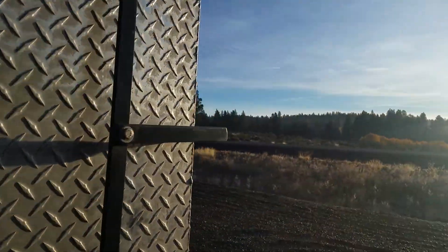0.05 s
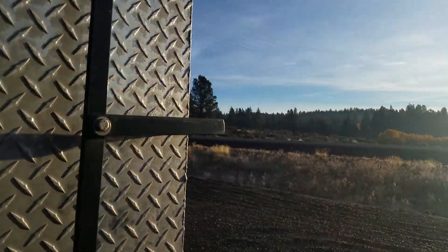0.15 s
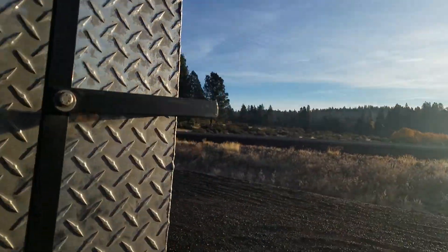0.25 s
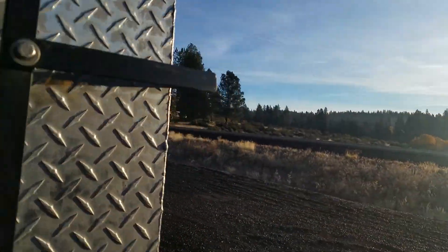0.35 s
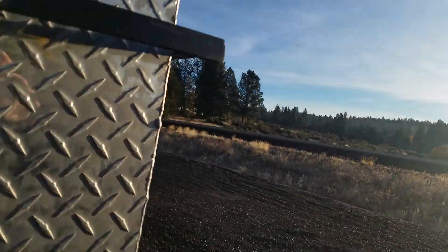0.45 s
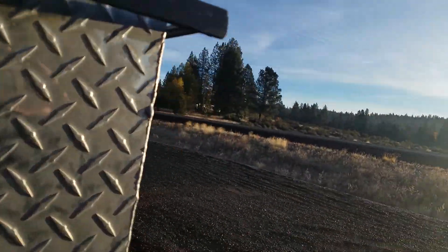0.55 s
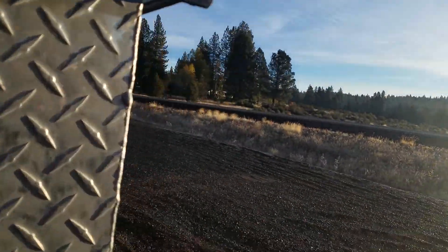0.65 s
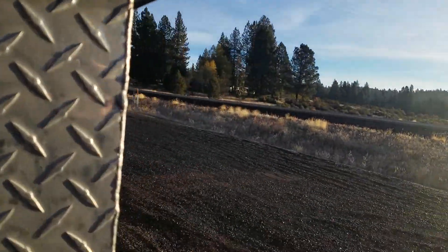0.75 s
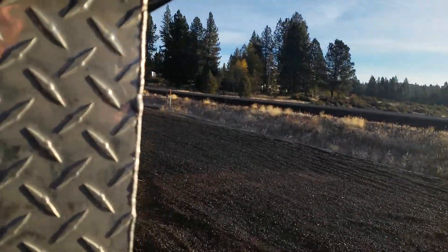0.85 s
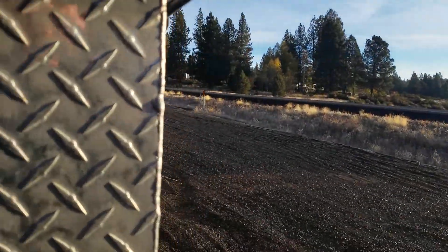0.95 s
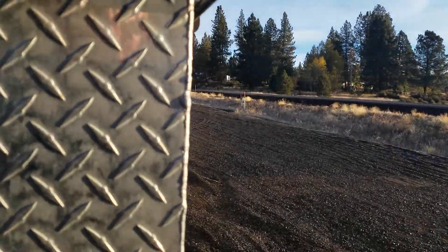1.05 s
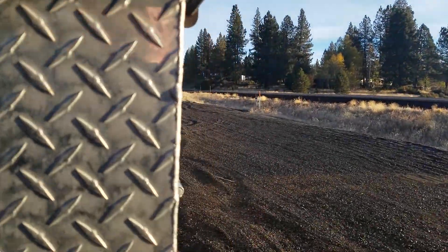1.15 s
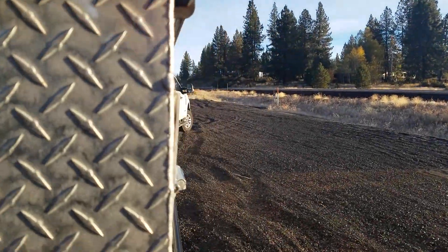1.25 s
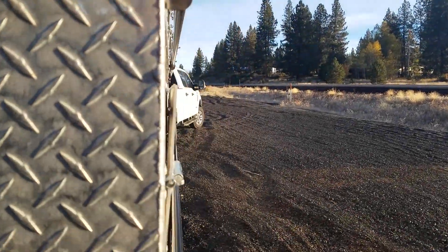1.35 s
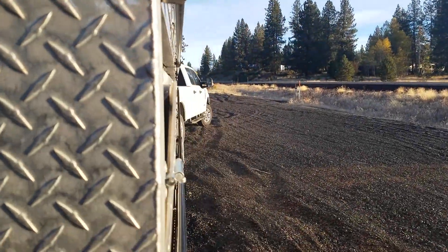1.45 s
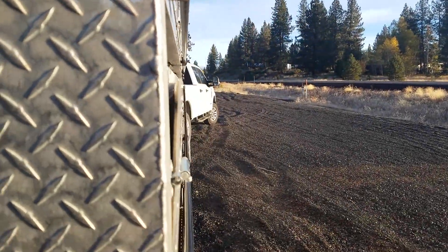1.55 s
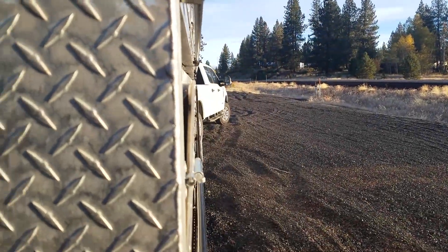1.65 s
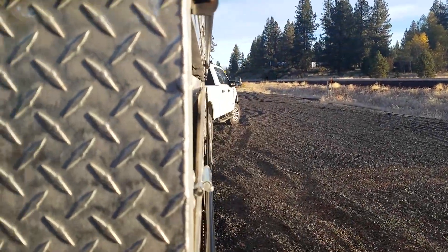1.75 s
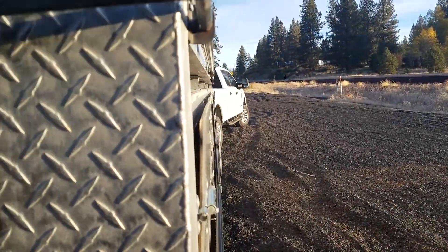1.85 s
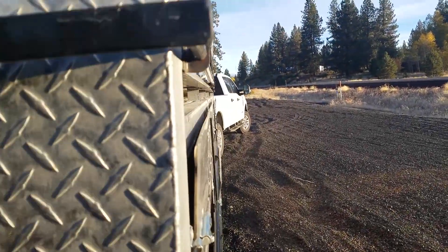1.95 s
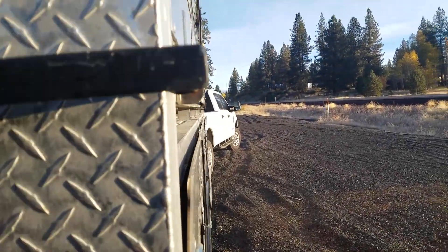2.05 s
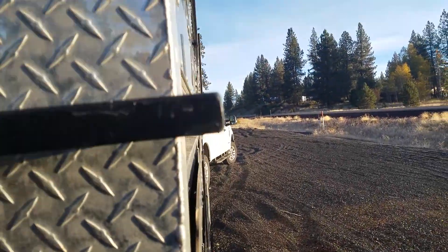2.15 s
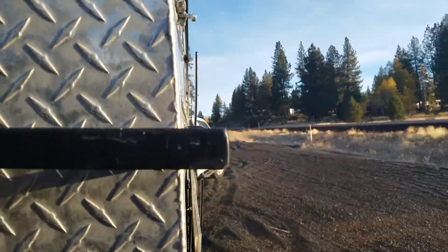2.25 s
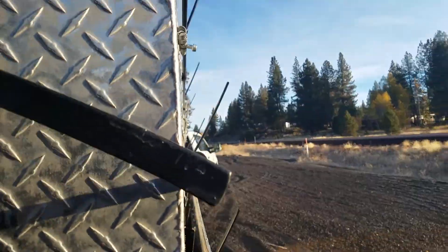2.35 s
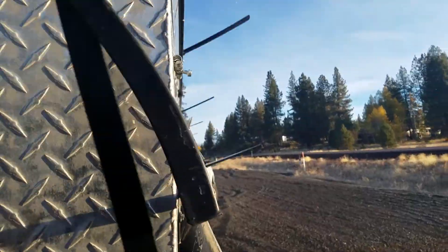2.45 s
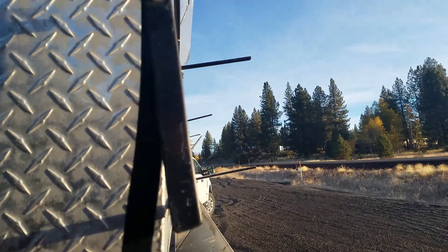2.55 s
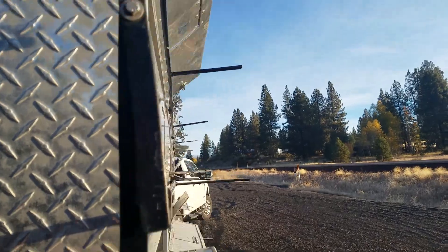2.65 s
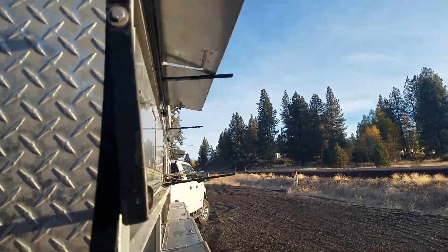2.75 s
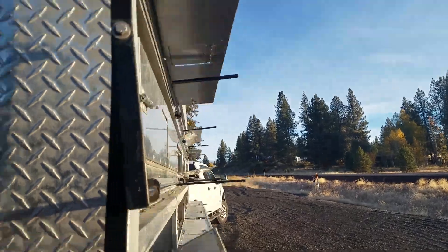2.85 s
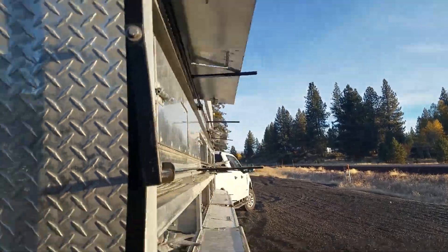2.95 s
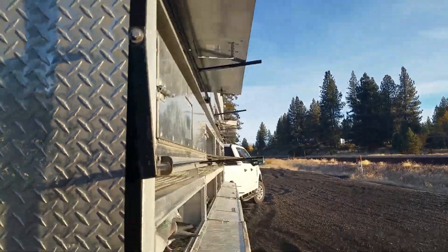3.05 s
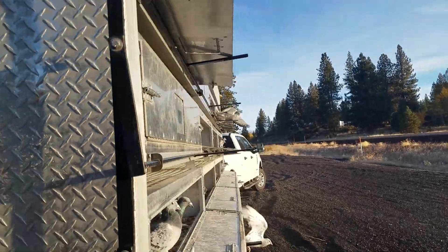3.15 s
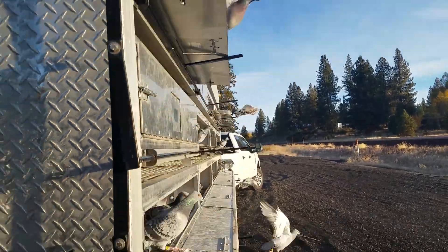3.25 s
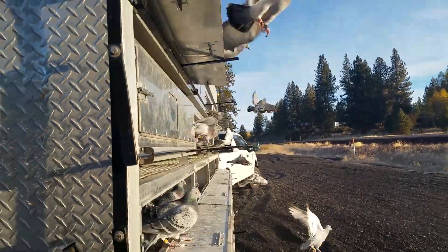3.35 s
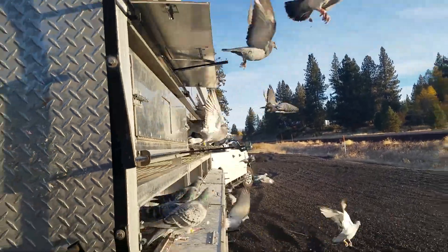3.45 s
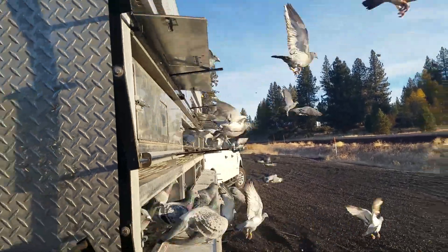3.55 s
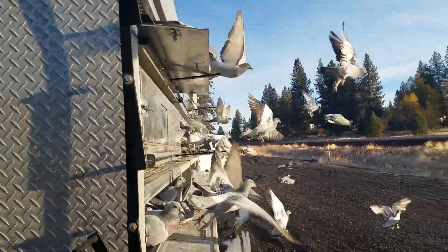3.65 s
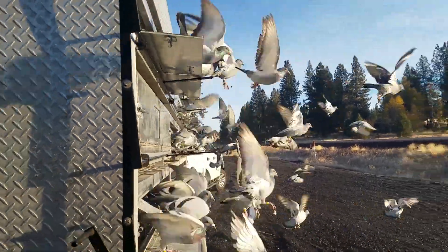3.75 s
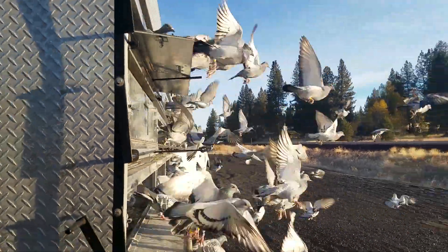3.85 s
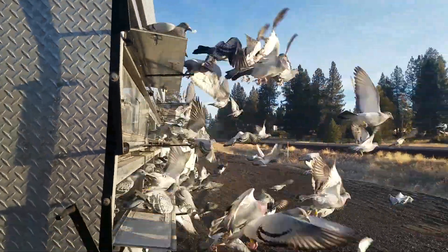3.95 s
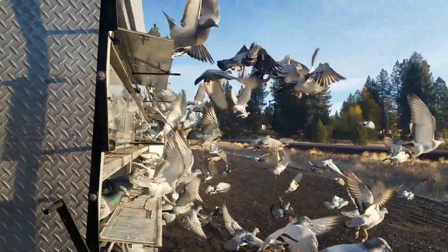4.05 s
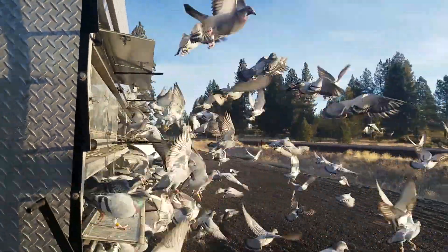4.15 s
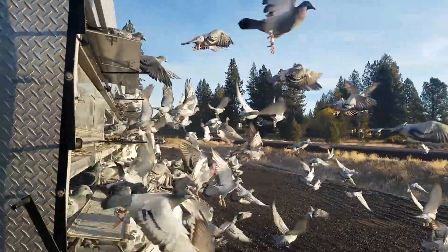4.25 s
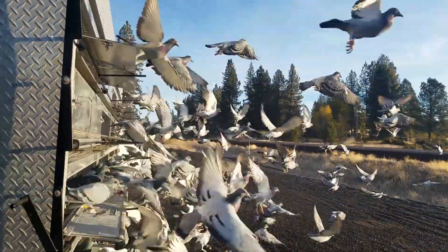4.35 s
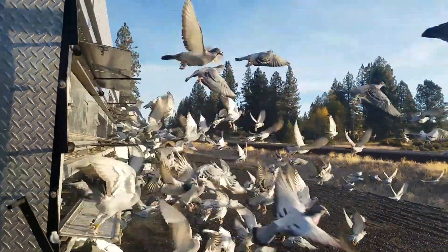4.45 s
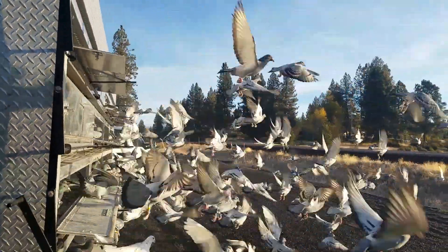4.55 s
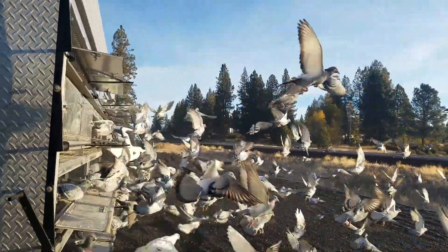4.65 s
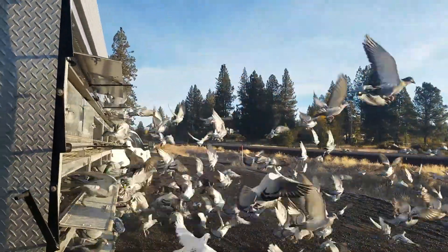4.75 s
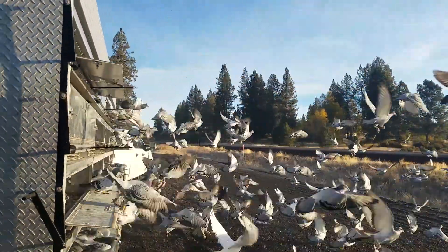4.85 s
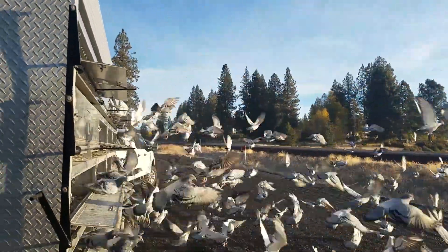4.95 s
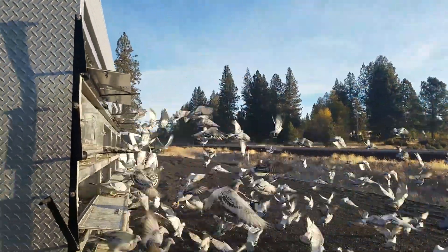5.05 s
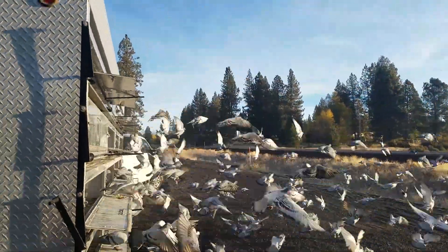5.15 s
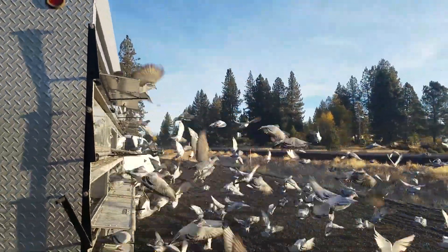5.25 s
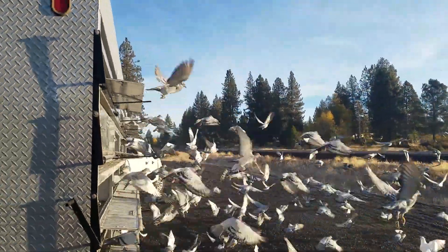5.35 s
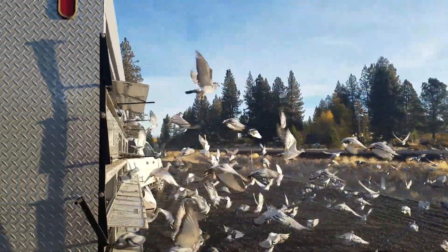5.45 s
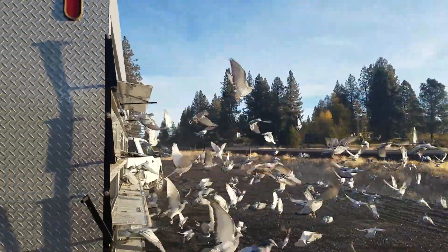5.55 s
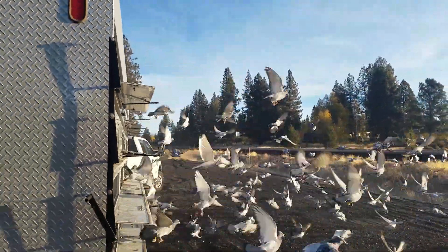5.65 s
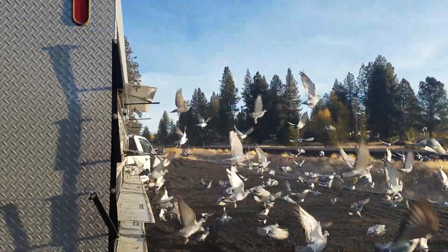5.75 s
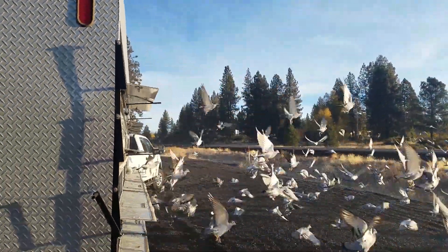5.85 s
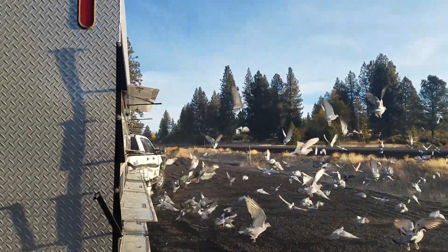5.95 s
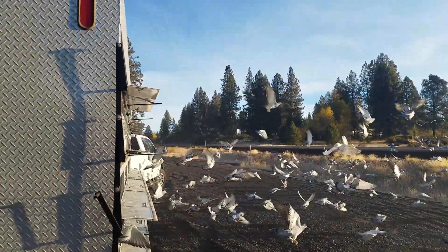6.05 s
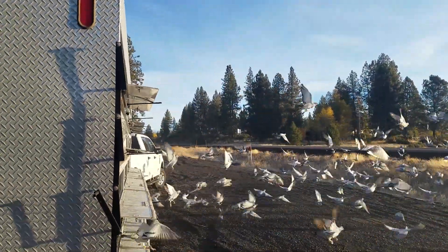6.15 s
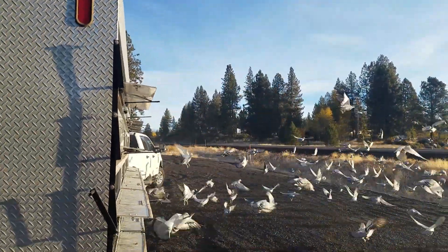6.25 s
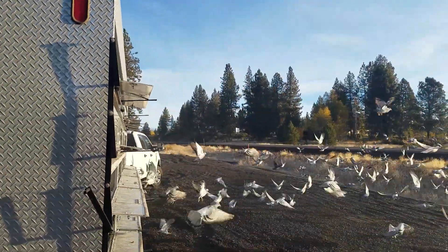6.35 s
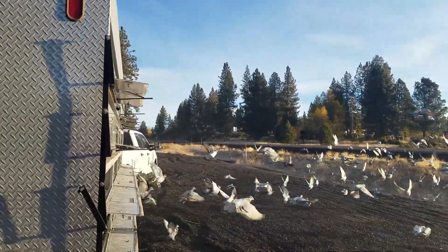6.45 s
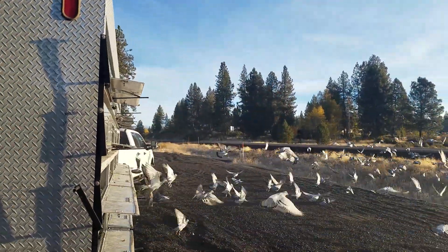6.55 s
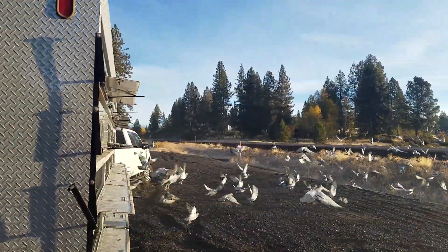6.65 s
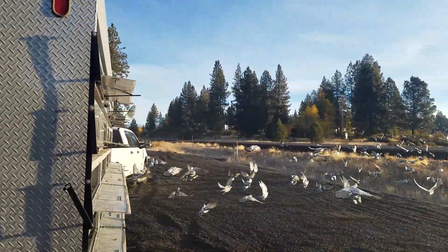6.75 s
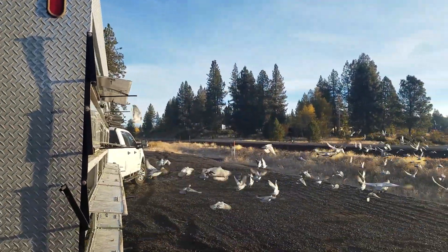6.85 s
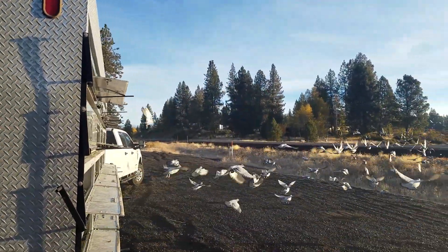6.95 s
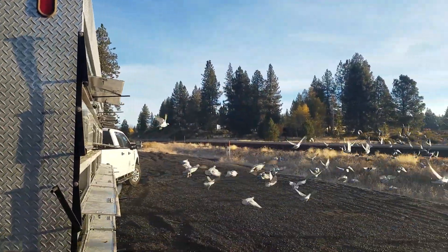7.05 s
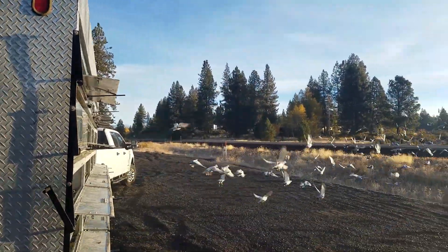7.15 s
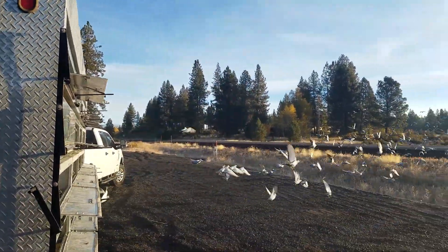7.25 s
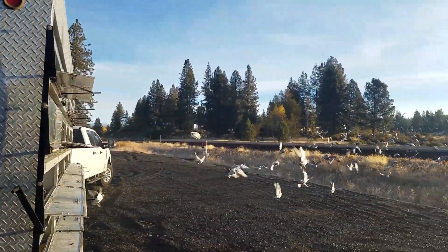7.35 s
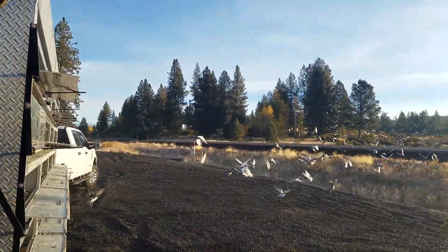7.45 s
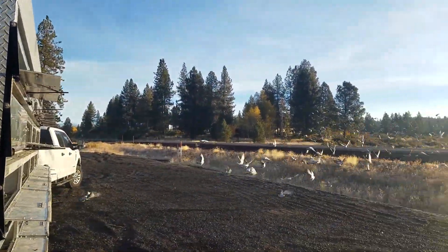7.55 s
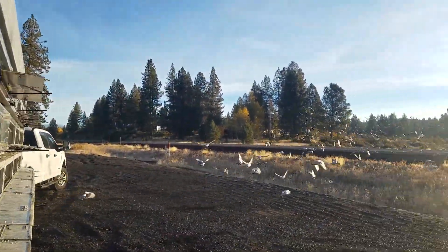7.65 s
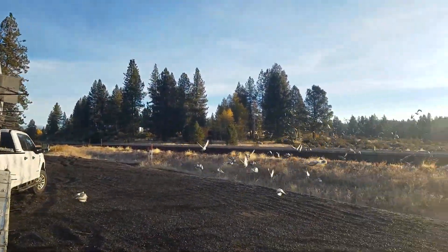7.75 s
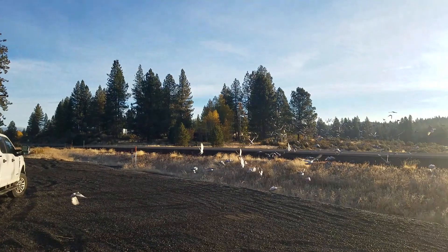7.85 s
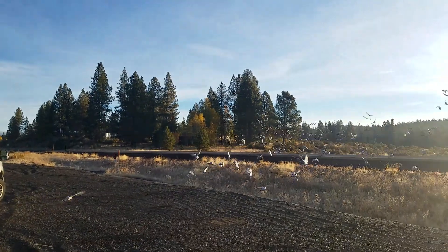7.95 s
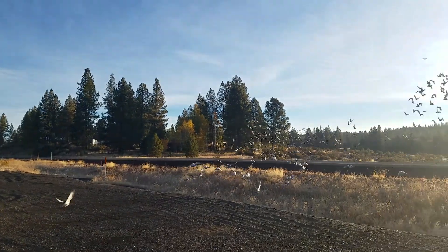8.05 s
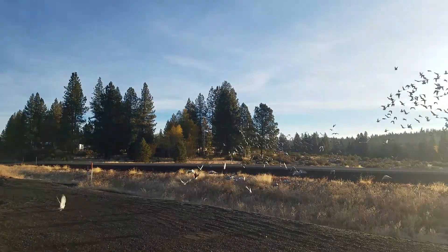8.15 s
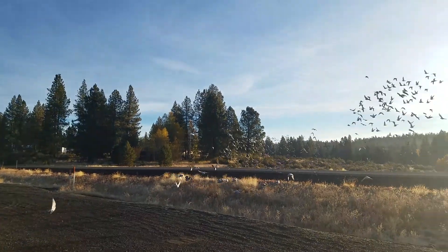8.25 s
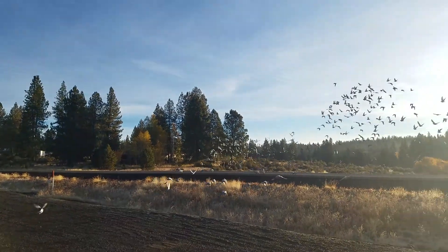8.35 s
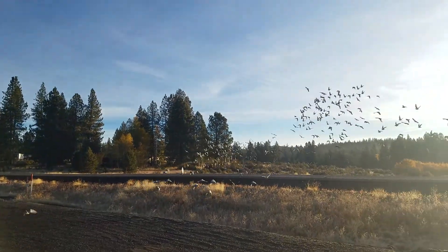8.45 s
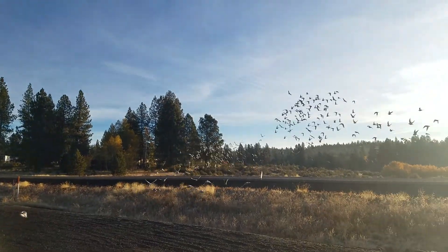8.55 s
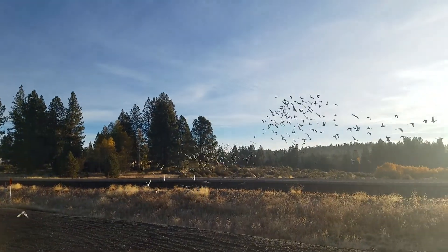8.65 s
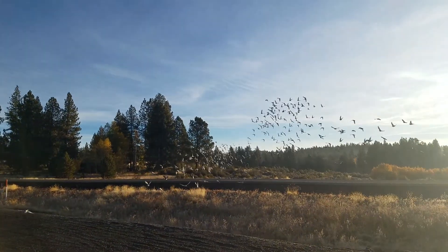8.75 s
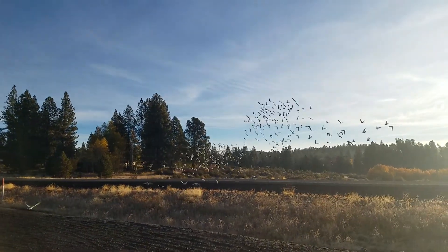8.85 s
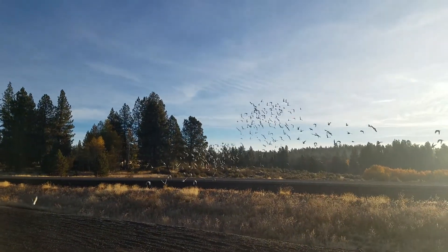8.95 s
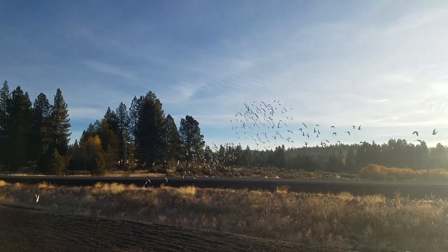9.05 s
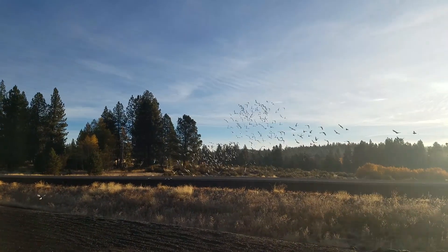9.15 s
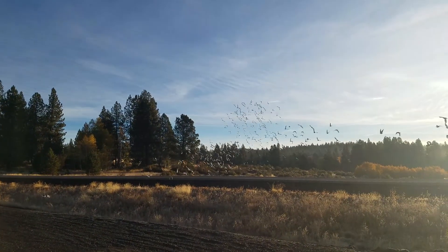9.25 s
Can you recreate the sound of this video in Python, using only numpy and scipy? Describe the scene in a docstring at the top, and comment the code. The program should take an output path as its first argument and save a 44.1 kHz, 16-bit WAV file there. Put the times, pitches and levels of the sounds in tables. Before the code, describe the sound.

Close to a steel trailer in open country: soft bird rustling inside, a dry pivot rub, then hard clanks of a catch and plate. After a short lull, a scraping swell and high squeal lead into a double boom and rapid rattling metal doors. Many wings erupt at once, airy and slapping, peaking quickly, then thinning as the flock flies off over a far, faint road. The close stereo microphone catches low puffs of wind.

```python
"""Pigeon trailer release

A lever is worked on a metal trailer on gravel in open country: knocks ring modes, hinges squeal,
the sheet side booms and rows of doors clatter open. Pigeons pour out and fly off: noise shaped by
wingbeats swishes, short bursts clap, a late bird whistles. Filtered noise gives the birds shuffling
in the crates, a rod's scrape, the air buffeting the microphone and a far road."""
import sys
import numpy as np
from scipy import signal
from scipy.fft import rfft, irfft
from scipy.io import wavfile
from scipy.ndimage import uniform_filter1d, map_coordinates

SR = 44100
rng = np.random.default_rng(int(sys.argv[2]) if len(sys.argv) > 2 else 0)


def to_wav(s):
    """Save 16-bit WAV."""
    ch = np.atleast_2d(s).T  # columns
    pcm = np.round(np.clip(ch, -1, 1) * 32767)  # PCM
    wavfile.write(sys.argv[1], SR, pcm.astype(np.int16))


N = 410571
T = np.arange(N) / SR
GRID_HZ = np.maximum(np.fft.rfftfreq(4096, 1 / SR), 1)
CUTOFF_HZ = 15850

# Levels are relative, ahead of each source's trims; positive left-right is left.
# loudness of the flock pouring out and drawing away: (time [s], level [dB])
FLOCK_LOUDNESS = [(3.55, -5.5), (4.06, 1.5), (4.45, 0.5), (5.29, -3), (5.76, -7.5), (6.66, -11.5),
                  (7.4, -16), (7.75, -22), (8.8, -31.5)]
FAR_S = (7.6, 8.2)   # the flock fades into the distance
# doors hitting their stops: (time [s], clank [dB], tick [dB], left-right [dB])
DOOR_SLAMS = [(2.4896, -18.5, -13, 3), (2.5645, -12.5, -36, -8.5), (2.6653, -17, -14, -8),
              (2.6955, -13.5, -11.5, -25), (2.7463, -14, -14, -6.5), (2.829, -24, -18.5, -7),
              (2.872, -22, -36, -11), (2.9214, -18.5, -16, -6.5), (2.998, -14, -12.5, -11),
              (3.0384, -19, -21, -9), (3.0885, -26, -20, -9), (3.2017, -33, -36, -6),
              (3.2471, -35, -54, -11), (3.27, -23.5, -27, -1), (3.3544, -25.5, -27, -5),
              (3.382, -27, -39, 9), (3.493, -28, -32, -6)]
# the rod is freed at the release, catches the doors, shakes them until its stop, and they settle
RELEASE_S, ROD_CATCHES_S, ROD_STOP_S = 2.49, 2.564, 3.137
# how alike the two sides are for most sources: (frequency [Hz], likeness [-1..1])
NEAR_LIKENESS = [(60, 0.94), (130, 1), (290, 0.94), (640, 0.72), (1400, 0.027), (3100, -0.073),
                 (15000, -0.15)]


def flock():
    """Wings push air low down, slap in the middle, hiss on top; near ones stand out until distance blends them."""
    # air push, wing flap, feather hiss: (level [dB], share of the loudness followed [ratio])
    flock_parts = [(-29, 1.12), (-33.5, 0.9), (-37.5, 1.12)]
    # (frequency [Hz], level [dB])
    flock_colour = [(88, -15), (150, 9.5), (327, -6.5), (421, -5.5), (598, -5), (937, -10), (1590, -8.5),
                    (2040, -10), (2580, -15), (3740, -20.5), (5100, -32), (8310, -27.5), (9900, -26),
                    (14900, -18.5), (15800, -26.5)]
    # (time [s], left-right [dB])
    flock_pan = [(3.55, 0), (3.79, -1), (5.52, -0.5), (5.75, 1), (7.9, 0.5), (8.01, -1), (9.31, -12)]
    airborne_s, push_rise_db_per_s = 4.17, 17   # the push builds until the first birds are in the air
    passed_s = (4.4, 6.5)   # the flock leaves the trailer

    push_db, flap_db, hiss_db = following(FLOCK_LOUDNESS, flock_parts)
    push_db = push_db - push_rise_db_per_s * np.maximum(airborne_s - T, 0)
    near, far = np.interp(T, passed_s, [1, 0]), np.interp(T, FAR_S, [0, 1])

    swish, claps = wingbeats(beat_hz=9.2, stroke_share=.045, spread_db=3.2, clap_share=.9, clap_s=.0018)
    wash = 0.3 + 3.9 * far
    grain = evened(wash + swish + .5 * claps, window_s=.11)
    noise = stereo(grain, flock_colour, pan_db=-4.0)
    push, flap, hiss = registers(noise, (push_db, flap_db, hiss_db), low_hz=183)

    side_db, = in_time(flock_pan)
    thinned = band(push, 415, 1200)   # only near wings push enough air for the lowest notes
    wings = from_db(-4.5) * (near * push + (1 - near) * 1.65 * thinned)
    wings = wings + from_db(-3.0) * flap * pan(side_db)
    wings = wings + from_db(1.0) * hiss * pan(0.49 * side_db)

    bursts = puffs(low_hz=360, high_hz=1690, per_s=24, puff_s=0.011)
    wings = wings + bursts * from_db(push_db - 5.0 - 15.0 * far)
    flicks = snaps(per_s=220, spread_db=4.0, low_hz=1410) * from_db(hiss_db - 3.5 - 10.5 * far)
    return (wings + flicks) * during(FLOCK_LOUDNESS, fade_s=0.81) * from_db(-3.0 * far)


def wingbeats(beat_hz, stroke_share, spread_db, clap_share, clap_s, count=30):
    """Each bird beats at its own rate: power of the swishing strokes and of the claps that start them."""
    # birds near enough to be told apart: (time [s], count [birds])
    near_birds = [(3.4, 0.5), (4.1, 23.5), (5.3, 34), (6.3, 15), (7.4, 16.5), (8.2, 19), (9.3, 24)]
    near, = in_time(near_birds)
    t = T[::20]
    swish, claps = np.zeros(len(t)), np.zeros(N)
    for k in range(count):
        rate_hz, offset = beat_hz * np.exp(.14 * rng.standard_normal()), rng.random()
        beat, phase = np.divmod(rate_hz * t + offset + 0.23 * np.sin(2 * t + k), 1)
        beat = beat.astype(int) % 200
        stroke_chance, clap_chance = rng.standard_normal((2, 200))

        presence = np.clip(near[::20] - k, 0, 1)
        power = from_db(2 * spread_db * np.clip(stroke_chance[beat], -2, 2)) * presence
        swish += power * np.exp(-((phase - stroke_share * 2) / stroke_share) ** 2)

        starts = np.flatnonzero(np.diff(beat)) + 1
        claps_now = rng.random(200)[beat[starts]] < clap_share
        claps[starts * 20] += power[starts] * claps_now * from_db(spread_db * clap_chance[beat[starts]])
    claps = decaying(claps, clap_s)
    return swish.repeat(20)[:N] / swish.mean(), claps / claps.mean()


def puffs(low_hz, high_hz, per_s, puff_s, count=4):
    """Short puffs of air from many wings at random moments, in a few pitch bands."""
    out = 0
    for hz in np.geomspace(low_hz, high_hz, count):
        power = contacts(per_s, spread_db=2.0, decay_s=puff_s)
        bursts = np.sqrt(np.abs(power)) * rng.standard_normal(N)
        out = out + rms_one(band(bursts, hz * .78, hz * 1.28)) * (low_hz / hz) ** .3
    return rms_one(out)


def snaps(per_s, spread_db, low_hz):
    """Stiff feathers flick each other: tiny bright clicks, a few of them large, each from its own side."""
    at = np.flatnonzero(rng.random(N) < per_s / SR)
    sizes = from_db(spread_db * np.minimum(rng.exponential(1, len(at)), 3.2))
    signs = rng.choice([-1, 1], len(at))
    clicks = np.zeros((2, N))
    clicks[:, at] = sizes * signs * pan(rng.normal(-1, 7, len(at)))
    # a little body and a bright top
    snap_db = at_hz([(low_hz / 4, -25), (low_hz, 3), (3500, 0), (5200, -8), (9000, -3), (14000, 2),
                     (15800, 2), (17000, -30)])
    return rms_one(np.array([colour(side, snap_db) for side in clicks]))


def wing_claps(count=60):
    """Wing tips meet over the back: timed claps among irregular random ones; puffs follow the flock's level."""
    # claps placed one by one, loud to faint: (time [s], slap [dB], snap [dB])
    timed_claps = [(3.5233, -14.5, -28.5), (3.7, -15, -31), (3.7773, -20, -37), (3.8143, -10, -34),
                   (3.839, -12, -42), (3.8908, -14, -35), (3.9415, -2, -26), (3.9525, -6.5, -30),
                   (3.9881, -11.5, -36), (4.0479, -5.5, -24), (4.11, -7.5, -29), (4.141, -14, -27),
                   (4.213, -9.5, -36), (4.2862, -17, -26.5), (4.3307, -26, -23), (4.4221, -6.5, -45),
                   (4.436, -9.5, -40), (4.496, -11.5, -36), (4.5316, -6, -24.5), (4.6, -17, -46),
                   (4.65, -15, -43), (4.7661, -13, -31), (4.8684, -18, -27), (4.9442, -19, -44),
                   (5.0779, -6.5, -22.5), (5.3103, -15.5, -38), (5.3991, -15.5, -30), (6.2688, -16, -33),
                   (6.288, -21, -32), (6.376, -21, -41), (6.4109, -28, -36), (6.453, -20, -44),
                   (6.4762, -17, -36), (6.606, -30, -40), (6.7047, -20, -34.5), (6.749, -33, -36),
                   (6.8015, -27, -43), (6.948, -28, -39), (7.004, -21, -39), (7.108, -17, -33),
                   (7.2074, -27, -47), (7.241, -19, -42), (7.379, -24, -43), (7.4341, -21, -37),
                   (7.458, -28, -42), (7.4994, -23, -38), (7.858, -44, -51), (8.0585, -29, -42)]
    # stiff quills crack: (frequency [Hz], width [Hz], gain [dB])
    clap_quills = [(3480, 890, 2)]
    puff_db, pan_db, ring_s = -6.5, -4, 0.026   # puff against the slap
    stray_per_s, stray_slap_db, stray_snap_db, stray_spread_db = 6.6, -27, -29, 1.5

    def loudness_db(s):
        return np.interp(s, *np.transpose(FLOCK_LOUDNESS))

    chance = rng.standard_normal((count, 3))
    times = FLOCK_LOUDNESS[0][0] + (np.arange(count) + 1 + 0.36 * chance[:, 0]) / stray_per_s
    levels = loudness_db(times)[:, None] + stray_spread_db * chance[:, 1:]
    levels = levels + [stray_slap_db, stray_snap_db]
    strays = [(s, slap, snap) for s, (slap, snap) in zip(times, levels) if s < FAR_S[1]]
    rows = [(s, slap, slap + puff_db + loudness_db(s), snap, pan_db, ring_s)
            for s, slap, snap in timed_claps + strays]
    claps = blows(rows, body_db=-20.0, low_db=-17.5, top_db=-3.5, low_ring=1.4, tail_db=10.5,
                  top_pan=0.24, width=0.3, hollow_db=9.5)
    return claps + resonate(claps, clap_quills)


def straggler(stroke_s=0.012, count=7):
    """One late bird's flight feathers whistle on every stroke, louder as it gets under way."""
    # (frequency [Hz], width [Hz], gain [dB])
    quill_modes = [(2590, 150, 11), (3060, 190, 17.5), (3440, 120, 14), (3760, 110, 15)]
    first_s, period_s = 7.172, .0824
    full_db, full_s, rise_db_per_s = -45, 7.29, 40
    strokes = np.zeros(N)
    for s in first_s + period_s * np.arange(count):
        span = slice(int(s * SR) - SR // 20, int(s * SR) + SR // 20)
        db = full_db - rise_db_per_s * max(full_s - s, 0)
        strokes[span] += from_db(db) * np.exp(-((T[span] - s) / stroke_s) ** 2)
    whistle = band(resonate(rng.standard_normal((2, N)), quill_modes), 1500, 4100)
    return strokes * rms_one(whistle) * pan(-1.1)


def doors(mode_width_hz=22):
    """Rods and doors chatter and slam; every contact rings the metal."""
    # (frequency [Hz], level [dB])
    rattle_colour = [(76, -32.5), (130, 3), (194, 0.5), (268, -7), (355, -4.5), (443, -12), (1010, -10),
                     (1920, -7.5), (2080, -7.5), (3650, -6), (5130, -14.5), (7980, -10), (9000, -13.5),
                     (10400, -11.5), (15800, -8.5)]
    # (frequency [Hz], gain [dB])
    door_modes = [(1610, -49), (1916, -41.5), (2315, -46), (2604, -46), (2821, -41), (3133, -43.5),
                  (3235, -36.5), (3488, -54), (3639, -43), (3790, -53.5), (3989, -40.5), (4226, -40.5),
                  (5389, -56), (6810, -51.5), (7041, -50.5), (8177, -47.5), (9152, -56.5), (9566, -50.5),
                  (9986, -41.5), (10374, -54)]
    # one source close by, so both sides agree further up: (frequency [Hz], likeness [-1..1])
    door_likeness = [(130, 1), (500, 0.96), (1000, 0.52), (2000, 1), (3700, 0.85), (5000, .2), (15000, .05)]
    slam_thud_db, slam_ring_s = -16.5, 0.17   # thud against the clank

    grain = evened(.45 + contacts(per_s=480, spread_db=2.2, decay_s=.0022), window_s=.03)
    chatter = rms_one(stereo(grain, rattle_colour, pan_db=-4.5, likeness=door_likeness))
    span = slice(int(RELEASE_S * SR), int((ROD_STOP_S + .5) * SR))
    struck = chatter[:, span]
    ringing = rms_one(resonate(struck, [(hz, mode_width_hz, db) for hz, db in door_modes]))
    broad = resonate(struck, [(3710, 720, -13.5), (8300, 690, -14.0), (10500, 500, -3.5)])
    chatter[:, span] += from_db(-15.5) * ringing + broad
    body, clatter, jingle = registers(chatter, shaking(), low_hz=130)
    rattle = from_db(3.0) * body + from_db(-1.5) * clatter + from_db(0.5) * jingle

    rows = [(s, clank, clank + slam_thud_db, tick, side, slam_ring_s) for s, clank, tick, side in DOOR_SLAMS]
    slams = blows(rows, body_db=-15.0, low_db=-6.0, top_db=-5.5, low_ring=1.0, tail_db=14.5,
                  top_pan=.2, width=.35)
    slams = slams + resonate(slams, [(3300, 840, 8.0)])
    return rattle * (T >= RELEASE_S) + slams


def shaking():
    """Levels [dB] of body, clatter, jingle: the sliding rod keeps the doors going, slams add their rebound."""
    clatter_db, jingle_db = -22, -28.5
    coast_db_per_s, settle_db_per_s = 175, 61   # sinks until the rod catches; settles after its stop
    shudder_db, shudder_fall_db_per_s = -28.5, 12.5   # low shudder is strongest at the release
    rebound_clatter_db, rebound_jingle_db, rebound_fall_db_per_s = -5.5, -11, 150.5   # against clank, tick

    rod_db = -settle_db_per_s * np.maximum(T - ROD_STOP_S, 0)
    coasting_db = -coast_db_per_s * np.maximum(T - RELEASE_S, 0) * (T < ROD_CATCHES_S)
    clatter = from_db(rod_db + clatter_db + coasting_db)
    jingle = from_db(rod_db + jingle_db)
    for s, clank_db, tick_db, _ in DOOR_SLAMS:
        rebound = (T >= s) * from_db(-rebound_fall_db_per_s * np.clip(T - s, 0, 2))
        clatter = np.hypot(clatter, rebound * from_db(clank_db + rebound_clatter_db))
        jingle = np.hypot(jingle, rebound * from_db(tick_db + rebound_jingle_db))
    body_db = shudder_db - shudder_fall_db_per_s * np.abs(T - RELEASE_S) + 0.21 * rod_db
    return body_db, 20 * np.log10(clatter + 1e-12), 20 * np.log10(jingle + 1e-12)


def wall():
    """The big sheet-metal side booms when the linkage heaves on it; it radiates little deep bass."""
    # soft blows: (time [s], level [dB], half length of the contact [s])
    booms = [(2.4536, -4, 0.0015), (2.4708, -4.5, 0.0035), (2.582, -19, 0.001), (2.631, -19, 0.0037),
             (2.81, -16.5, 0.0072), (2.853, -21.5, 0.0069), (2.952, -16.5, 0.0064)]
    # (frequency [Hz], gain [dB], t60 [s])
    wall_modes = [(129.7, -26.5, 0.33), (160, -18.5, .25), (198, -23, 0.11), (234.5, 1.0, 0.25),
                  (288, -7, 0.086), (320, -19, 0.14), (424, -21, 0.36), (464, -14, 0.082),
                  (570, -15.5, 0.17)]
    force = np.zeros(N)
    for s, db, contact_s in booms:
        touch = np.flatnonzero(np.abs(T - s) < contact_s)
        push = np.exp(-((T[touch] - s) * 4 / contact_s) ** 2)
        force[touch] += from_db(db) * push / push.sum()
    return band(ring(force, wall_modes), 190, 2000, order=4) * pan(.5)


def lever():
    """Each knock is a dull blow and the ring of the part it strikes: steel bar, catch or tread plate."""
    # (time [s], clank [dB], thud [dB], tick [dB], left-right [dB], ring time [s], part struck)
    knocks = [(0.4323, -31, -30, -24.5, 16, 0.032, "bar"), (0.7236, -51, -52, -33, 10, .02, "bar"),
              (0.9433, -41, -49, -34, 2, .03, "bar"), (1.1087, -25.5, -29, -32, -5, 0.031, "plate"),
              (1.1409, -33, -33, -23, 5, 0.02, "bar"), (1.1808, -14.5, -24.5, -18.5, -3, 0.048, "bar"),
              (1.2596, -44, -50, -33, 3, 0.012, "bar"), (1.4039, -14, -20, -14.5, -4, 0.056, "catch"),
              (1.4172, -28, -34, -34, -9, .04, "catch"), (1.4674, -14, -25, -32, -2, 0.045, "plate"),
              (1.4795, -29, -30, -42, -6, .04, "plate"), (1.4914, -21, -22, -31, -4, 0.035, "plate"),
              (1.687, -36, -48, -34, -4, 0.022, "bar"), (2.0428, -28, -41, -36, -6, 0.04, "plate"),
              (2.0818, -30.5, -48, -29.5, -6, 0.17, "bar"), (2.1722, -34, -35, -39, -7, 0.022, "bar"),
              (2.2189, -52, -53, -39, 0, .02, "catch"), (2.259, -74, -46, -29, 2, .06, "bar")]
    # by part: (frequency [Hz], gain [dB], t60 [s])
    latch_modes = {"bar": [(1373, -2, .11), (1642, 4, .095), (2062, -14, .14), (2300, -5, .07),
                   (2630, -11, .06), (3795, -9, .06), (4113, -15, .05), (6401, -19, .08)],
                   "catch": [(657, -11, .3), (899, -6, .22), (1071, -2, .14), (1290, 1, .045),
                   (1534, 1, .06), (1950, 0, .035), (2207, -10, .08), (3736, -13, .06), (4680, 0, .05),
                   (5658, -13, .045), (6541, -13, .055)], "plate": [(554, -1, .17), (641, -2, .16),
                   (899, -9, .2), (985, -5, .13), (1350, -2, .035), (1723, -1, .06), (2020, -1, .04),
                   (3200, -6, .04), (3520, -7, .04), (4500, -13, .03)]}
    ring_db, chatter_s, chatter_db = -10, 0.004, -10   # ring against the clank; the contact chatters briefly

    out = blows([row[:-1] for row in knocks], body_db=-15.0, low_db=-8.0, top_db=-6.5, low_ring=5.0,
                tail_db=10.5, top_pan=0.42, width=0.58)
    t = T[:SR // 3]
    for s, clank_db, _, _, side_db, _, part in knocks:
        chatter = rng.standard_normal((2, len(t))) * np.exp(-t / chatter_s)
        force = (t == 0) + from_db(chatter_db) * chatter / np.linalg.norm(chatter[0])
        metal = attack_one(ring(force, latch_modes[part]))
        start = int(s * SR)
        out[:, start:start + len(t)] += metal * from_db(clank_db + ring_db) * pan(1.4 * side_db)
    return out


def hinges():
    """Hinges and rods sing on an unsteady pitch; far left ones, behind the plate, reach the right port late."""
    # the first two rows are one low bump and its ring, the rest squeals and creaks:
    # (start [s], loudest [s], end [s], pitch [Hz], rms waver [Hz], level [dB], left-right [dB])
    tones = [(.838, .855, 0.86, 483, 81, -23, 4), (.843, .850, 1.02, 328.4, 35, -27.5, 4),
             (2.07, 2.083, 2.1, 3190, 260, -30, -3), (2.30, 2.36, 2.42, 440, 20, -32.5, 2),
             (2.328, 2.340, 2.395, 10610, 90, -31, 5), (2.335, 2.430, 2.488, 12252, 33, -14.7, 4.5),
             (2.42, 2.428, 2.445, 9150, 90, -31.5, -1), (2.35, 2.46, 2.62, 1120, 8, -30.5, -5),
             (2.40, 2.44, 2.50, 494, 50, -26.5, 0), (2.5, 2.61, 2.88, 385, 16, -29.5, 3)]
    behind_plate_db, behind_plate_lag_s = 4, .0003
    out, waver = np.zeros((2, N)), drift(rate_hz=180)
    for k, (start, top, end, hz, waver_hz, db, side_db) in enumerate(tones):
        span = slice(int(start * SR), int(end * SR))
        swell = np.interp(T[span], [start, top, end], [0, 1, 0]) ** 2
        pitch_hz = hz + waver_hz * waver[k * SR // 2:][:len(swell)]
        lag_s = np.array([[0], [behind_plate_lag_s * (side_db > behind_plate_db)]])
        cycles = np.cumsum(pitch_hz) / SR - hz * lag_s
        out[:, span] += from_db(db) * swell * np.sqrt(2) * np.sin(2 * np.pi * cycles) * pan(side_db)
    return out


def pivot():
    """The lever rubs on its dry pivot: dense little slips into a few broad resonances."""
    # (start [s], loudest [s], end [s], level [dB])
    rubs = [(.225, .295, 0.36, -34.5), (0.377, 0.393, 0.412, -33.5)]
    # (frequency [Hz], width [Hz], gain [dB])
    rub_modes = [(1080, 200, 9), (1290, 170, 4), (2100, 550, -5), (3080, 530, -1)]
    swell = sum(from_db(db) * np.interp(T, [start, top, end], [0, 1, 0]) ** 2 for start, top, end, db in rubs)
    slips = np.sqrt(.3 + contacts(per_s=320, spread_db=5.0, decay_s=.002)) * rng.standard_normal(N)
    return swell * rms_one(band(resonate(slips, rub_modes), 850, 2800)) * pan(2.1)


def crates():
    """Birds shuffle in the shut trailer, then the linkage rod scrapes in a swell just before the release."""
    # shuffling, then rod scrape: (time [s], level [dB])
    activity = [(0.0, -6), (0.35, -2.5), (0.75, -2.5), (1.38, 3), (1.6, 0), (2.31, 2.5), (2.415, 9.5),
                (2.445, 17), (2.48, 16)]
    # (frequency [Hz], level [dB])
    shuffle_colour = [(120, -35.5), (200, -2), (263, -5), (305, -4), (464, -6.5), (508, -8.5), (760, -16),
                      (1060, -21.5), (1900, -21.5), (2730, -27.5), (3050, -29.5), (5370, -37.5),
                      (8960, -35.5), (11400, -26.5), (15800, -27.5)]
    # low, middle, top: (level [dB], share of the activity followed [ratio])
    shuffle_parts = [(-39.5, 0.74), (-43.5, 1.0), (-50.5, 0.76)]
    levels_db = following(activity, shuffle_parts)
    grain = evened(1.4 + contacts(per_s=77, spread_db=2.5, decay_s=0.0048), window_s=0.37)
    noise = stereo(grain, shuffle_colour, pan_db=1.0)
    noise = noise + resonate(noise, [(1805, 650, -6.0)])
    low, middle, top = registers(noise, levels_db, low_hz=260)
    ticks = snaps(per_s=260, spread_db=4.5, low_hz=1800) * from_db(levels_db[2] - 4)
    scraping = from_db(-1.0) * low + from_db(-2.5) * middle + from_db(4.0) * top + ticks
    return scraping * during(activity, fade_s=0.15)


def air():
    """A breeze from the left and the draught of the wings from ahead, over the far road."""
    # breeze on the microphone: (time [s], level [dB])
    breeze = [(0.0, -38), (0.15, -33), (1.5, -33.5), (2.1, -36.5), (2.9, -38), (3.5, -46), (6.0, -51.5),
              (7.2, -53.5), (8.1, -61), (9.3, -50)]
    # single late gusts: (time [s], level [dB])
    gust_peaks = [(7.49, -49), (8.48, -46.5), (8.64, -66), (8.87, -41), (9.12, -45), (9.32, -34)]
    # (frequency [Hz], level [dB])
    road_colour = [(60, -7.5), (140, -4.5), (250, -4.5), (650, -2), (810, 2), (950, -8), (1900, -10.5),
                   (3200, -23), (5000, -30), (9500, -32.5), (12500, -26.5), (15800, -25)]
    gust_s, road_db = 0.023, -54   # half length of a gust
    gusts = sum(from_db(db) * np.exp(-np.minimum(((T - s) / gust_s) ** 2, 20)) for s, db in gust_peaks)
    wind = rumble(np.hypot(from_db(in_time(breeze)[0]), gusts))
    # the flock streams past: its draught builds, holds and dies away
    draught_db = -33 + held(full_s=3.92, until_s=5.6, rise_db_per_s=45.5, fall_db_per_s=32)
    draught = rumble(from_db(draught_db))
    road = rms_one(np.array([colour(side, at_hz(road_colour)) for side in rng.standard_normal((2, N))]))
    return from_left(wind, lag_s=.0004) + draught + from_db(road_db) * road


def rumble(flow, flutter_db=1.0):
    """Moving air buffets the microphone."""
    # (frequency [Hz], level [dB])
    buffet_colour = [(13, -39), (22, -9), (59, -1.5), (102, 0.5), (265, -10.5), (447, -20.5), (700, -22.5),
                     (910, -39), (1540, -120)]
    flutter = from_db(flutter_db * drift(rate_hz=15))
    return from_db(2.5) * flow * rms_one(stereo(flutter, buffet_colour, pan_db=3.0))


def blows(rows, body_db, low_db, top_db, low_ring, tail_db, top_pan, width, hollow_db=None):
    """Each blow is one sharp pressure step and a noisy tail, in three bands with their own ring times."""
    out, t = np.zeros((2, N + SR)), T[:SR // 6]
    for s, mid, low, top, side_db, ring_s in rows:
        start = int(max(s, 0) * SR)
        # low [Hz], high [Hz], level [dB], t60 [s], stereo width, share of the panning
        parts = [(280, 1010, low + low_db, ring_s * low_ring, 0.2, .2),
                 (920, 2460, mid + body_db, ring_s, width, 0.94),
                 (5740, .45 * SR, top + top_db, ring_s * 0.67, 0.56, top_pan)]
        for lo, hi, db, t60, apart, lean in parts:
            centre, side = rng.standard_normal((2, len(t)))
            tail = (centre + apart * side * np.array([[1], [-1]])) * from_db(-60 * t / max(t60, 1e-3))
            hit = band((t == 0) + from_db(tail_db) * tail / np.sqrt(np.sum(tail[0] ** 2)), lo, hi)
            if hollow_db is not None and hi < CUTOFF_HZ:
                # air cupped between the wings rings, at another pitch on each clap
                hit = hit + resonate(hit, [(rng.uniform(lo, 0.807 * hi), 170, hollow_db)])
            out[:, start:start + len(t)] += attack_one(hit) * from_db(db) * pan(side_db * lean)
    return out[:, :N]


def stereo(envelope, spectrum, pan_db, likeness=NEAR_LIKENESS):
    """Noise under an envelope; likeness sets at each pitch how far the two sides agree."""
    # (frequency [Hz], panning that reaches this pitch [ratio])
    shadow = [(400, 0.0034), (700, 0.077), (1300, 1.4), (2400, 0.91), (4400, 1.2), (8100, 1.1),
              (15000, 0.52)]
    alike, db = np.clip(at_hz(likeness), -.98, .98), at_hz(spectrum)
    mid, side = envelope * rng.standard_normal((2, N))
    mid = colour(mid, db + 10 * np.log10(1 + alike))
    side = colour(side, db + 10 * np.log10(1 - alike))
    lean_db = at_hz(shadow) * pan_db / 2
    return np.array([colour(mid + side, lean_db), colour(mid - side, -lean_db)])


def contacts(per_s, spread_db, decay_s):
    """Power of random little contacts, each dying away; mean 1."""
    sizes = from_db(2 * spread_db * np.minimum(rng.exponential(1, N), 4))
    power = decaying(sizes * (rng.random(N) < per_s / SR), decay_s)
    return power / power.mean()


def decaying(impulses, decay_s):
    """Exponential decay after each impulse."""
    return signal.lfilter([1], [1, -np.exp(-1 / (decay_s * SR))], impulses + 1e-18)


def evened(power, window_s):
    """Envelope that keeps the grain of a power curve but not its slow swells."""
    return np.sqrt(power / (np.abs(uniform_filter1d(power, int(window_s * SR))) + 1e-9))


def registers(x, levels_db, low_hz):
    """Low, middle and top of a sound, each at its level in time."""
    edges_hz = [low_hz, 900, 4500, 19000]
    return [rms_one(band(x, lo, hi, order=4)) * from_db(db)
            for lo, hi, db in zip(edges_hz, edges_hz[1:], levels_db)]


def ring(force, modes):
    """Struck modes of (Hz, dB, t60 s)."""
    out = 0
    for hz, db, t60 in modes:
        r, w = from_db(-60 / (t60 * SR)), 2 * np.pi * hz / SR
        mode = signal.lfilter([0, np.sin(w)], [1, -2 * r * np.cos(w), r * r], force + 1e-18)
        out = out + from_db(db) * mode
    return out


def resonate(x, modes):
    """Parallel resonances of (Hz, width Hz, dB)."""
    out = 0
    for hz, width_hz, db in modes:
        r, w = np.exp(-np.pi * width_hz / SR), 2 * np.pi * hz / SR
        b, a = [(1 - r * r) / 2, 0, (r * r - 1) / 2], [1, -2 * r * np.cos(w), r * r]
        out = out + from_db(db) * signal.lfilter(b, a, x + 1e-18)
    return out


def colour(x, db):
    """Causal (minimum-phase) filter with the given gains."""
    cepstrum = irfft(np.log(from_db(db)))
    half = len(cepstrum) // 2
    folded = np.r_[cepstrum[0], 2 * cepstrum[1:half], np.zeros(half)]
    impulse_response = irfft(np.exp(rfft(folded)))[:half]
    return signal.oaconvolve(x, impulse_response)[:len(x)]


def band(x, low_hz, high_hz, order=2):
    """Butterworth band-pass."""
    return signal.sosfilt(signal.butter(order, [low_hz, high_hz], "band", fs=SR, output="sos"), x)


def at_hz(points):
    """A spectrum on the filter grid, interpolated in log frequency."""
    hz, value = np.transpose(points)
    return np.interp(np.log(GRID_HZ), np.log(hz), value)


def in_time(rows):
    """Columns of a curve at every sample."""
    s, *columns = np.transpose(rows)
    return [np.interp(T, s, c) for c in columns]


def following(curve, parts):
    """Levels in dB of several parts that follow one control."""
    control_db, = in_time(curve)
    return [db + share * control_db for db, share in parts]


def during(rows, fade_s):
    """1 while a curve lasts, fading outside it."""
    return np.clip(1 + np.minimum(T - rows[0][0], rows[-1][0] - T) / fade_s, 0, 1)


def held(full_s, until_s, rise_db_per_s, fall_db_per_s):
    """Attack, hold at 0 dB and release, in dB at every sample."""
    return -rise_db_per_s * np.maximum(full_s - T, 0) - fall_db_per_s * np.maximum(T - until_s, 0)


def drift(rate_hz):
    """Smooth random curve of rms 1, two knots to a cycle of rate_hz."""
    knots = rng.standard_normal(4000)
    curve = map_coordinates(knots, [T[::20] * rate_hz * 2], order=2, mode="wrap")
    return rms_one(curve).repeat(20)[:N]


def pan(db):
    """Left and right gains with mean 1."""
    gains = from_db(np.array([[.5], [-.5]]) * db)
    return gains / gains.mean(axis=0)


def from_left(x, lag_s):
    """Sound from the left reaches the right port a little later."""
    return np.array([x[0], np.r_[np.zeros(int(lag_s * SR)), x[1]][:N]])


def attack_one(hit):
    """Scale a hit so that its first milliseconds have rms 1."""
    return hit / np.sqrt(np.mean(hit.mean(axis=0)[:SR // 150] ** 2))


def rms_one(x):
    """Scale so that the centre of the stereo image has rms 1."""
    return x / np.sqrt(np.mean(np.atleast_2d(x).mean(axis=0) ** 2) + 1e-20)


def from_db(db):
    """Decibels to gain."""
    return 10 ** (np.asarray(db) / 20)


def scene():
    """Birds, doors, latch and open air."""
    released = flock() + straggler() + wing_claps()
    trailer = lever() + wall() + doors()
    inside = from_left(crates() + pivot(), lag_s=.0002)
    return from_left(released + trailer, lag_s=.00007) + hinges() + inside + air()


def record(dry):
    """Each microphone port adds its own colour; peaks stop at full scale; the top is cut."""
    # the two ports resonate differently: (frequency [Hz], left-right [dB])
    ports = [(900, 0.5), (1700, -3.5), (3000, -0.5), (4300, 1), (5300, 5), (6500, -1.5), (8000, -7.5),
             (9300, 0), (11000, 3.5), (12000, 7.5), (13500, -1.5), (15500, 0.5)]
    lean_db = at_hz(ports) * np.array([[.5], [-.5]])
    lean_db = lean_db - 10 * np.log10(np.mean(from_db(lean_db) ** 2, axis=0))
    heard = np.array([colour(side, db) for side, db in zip(dry, lean_db)])
    top_cut = signal.ellip(12, .1, 80, CUTOFF_HZ, fs=SR, output="sos")
    return signal.sosfilt(top_cut, np.clip(heard, -1, 1))


dry = scene()
out = record(dry)
to_wav(out)
```